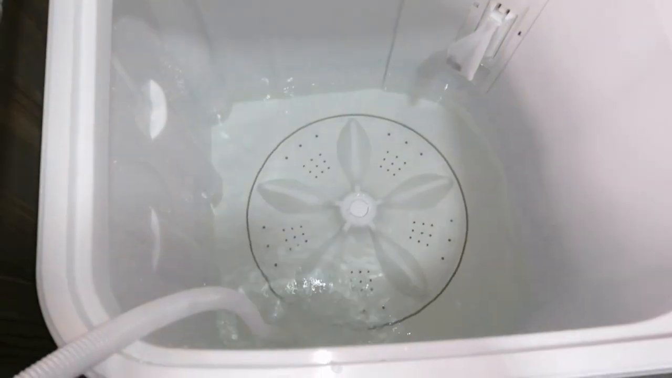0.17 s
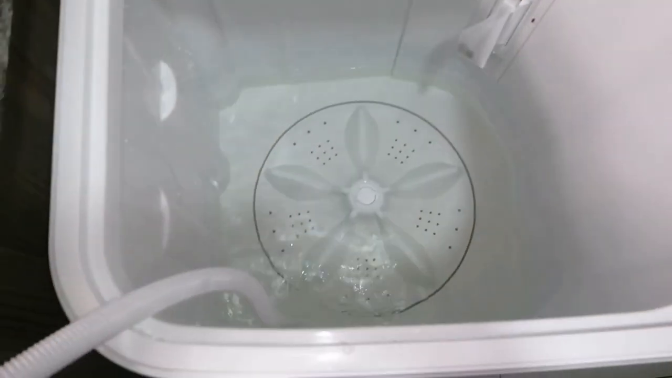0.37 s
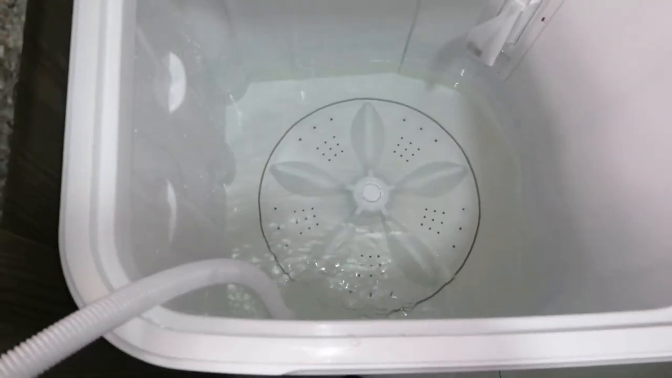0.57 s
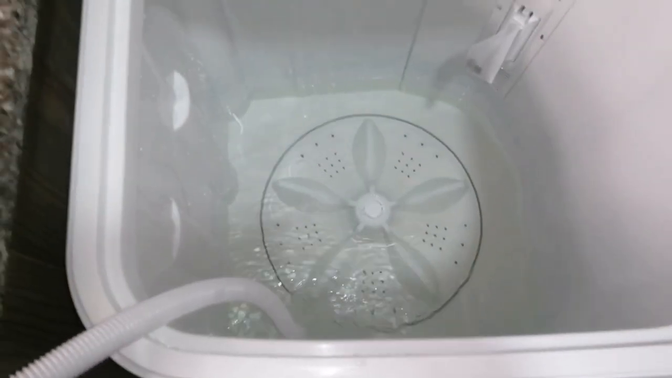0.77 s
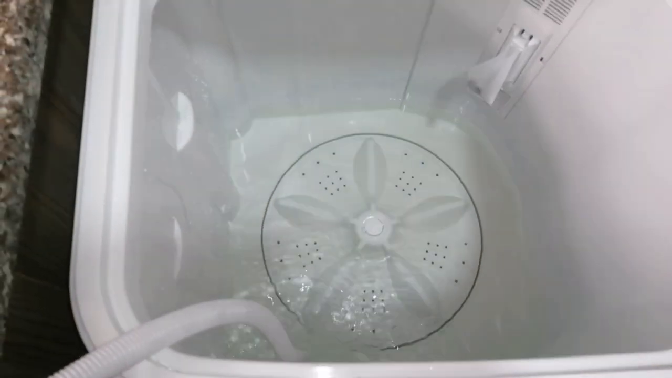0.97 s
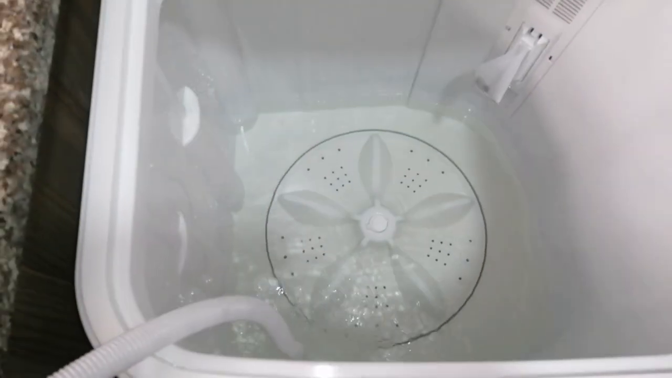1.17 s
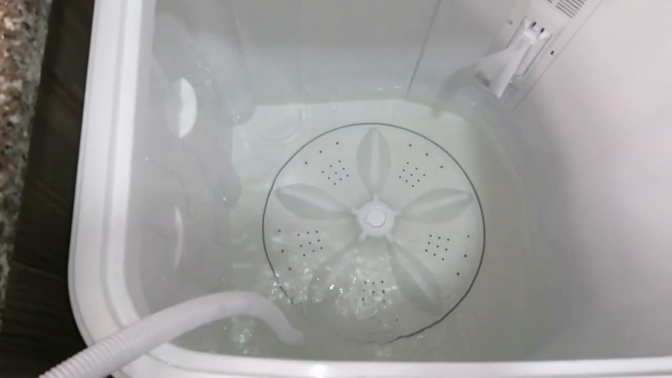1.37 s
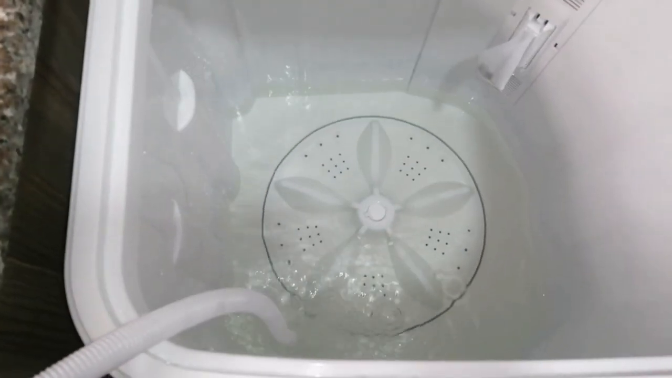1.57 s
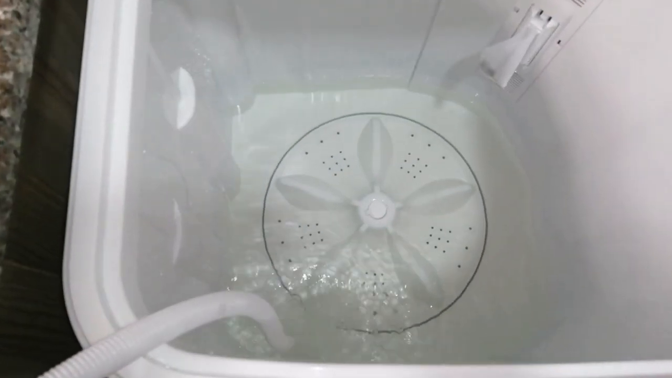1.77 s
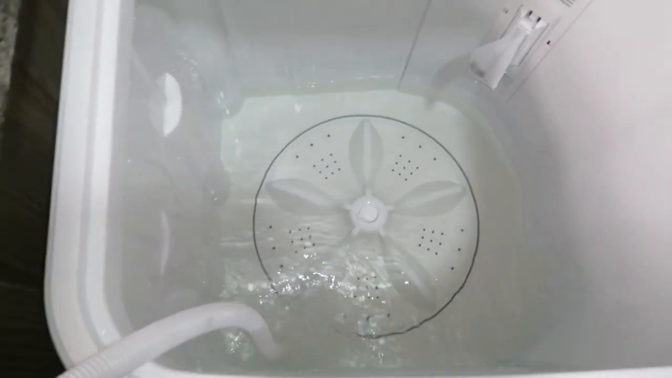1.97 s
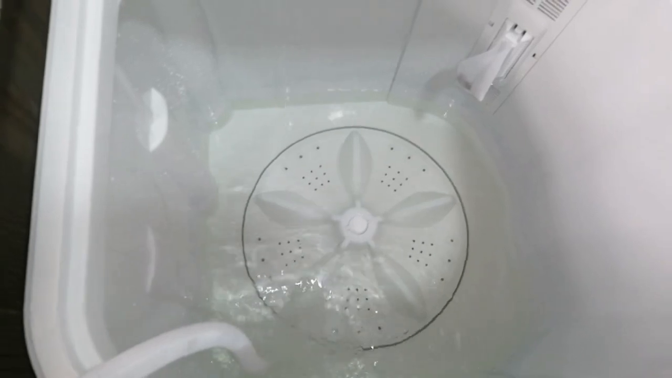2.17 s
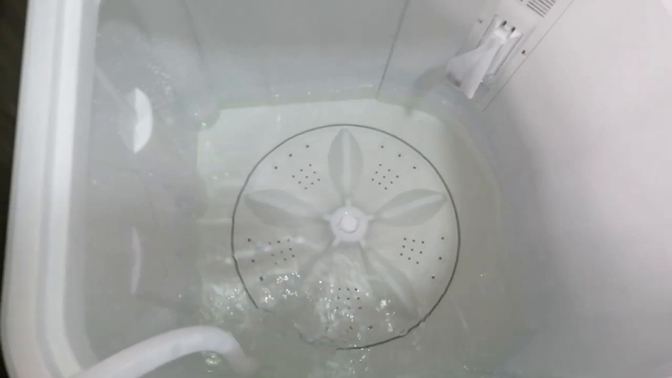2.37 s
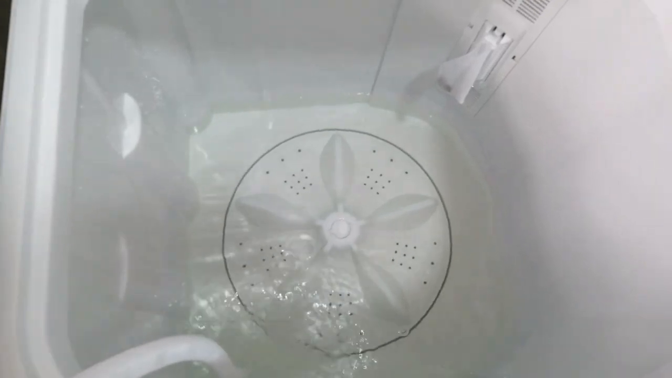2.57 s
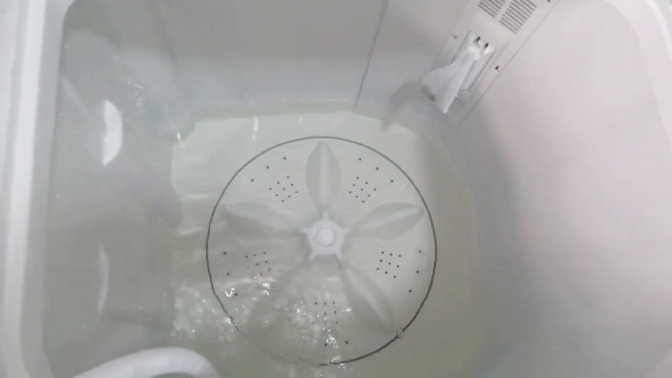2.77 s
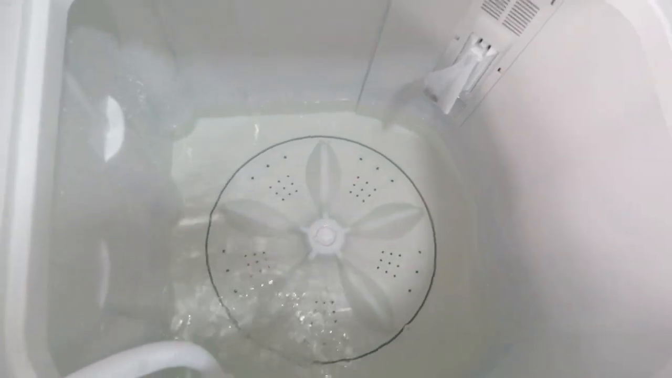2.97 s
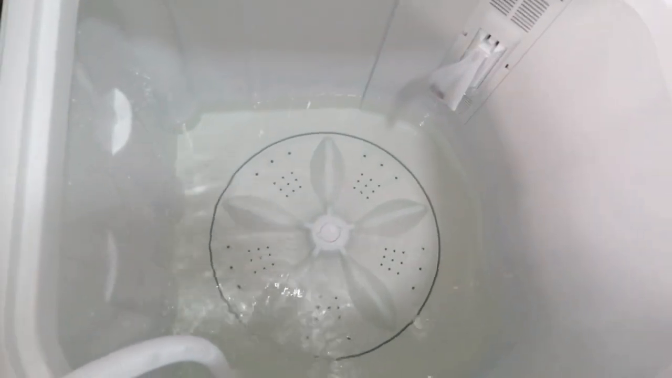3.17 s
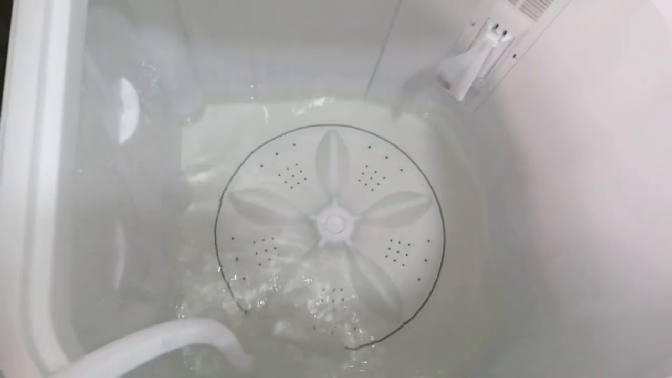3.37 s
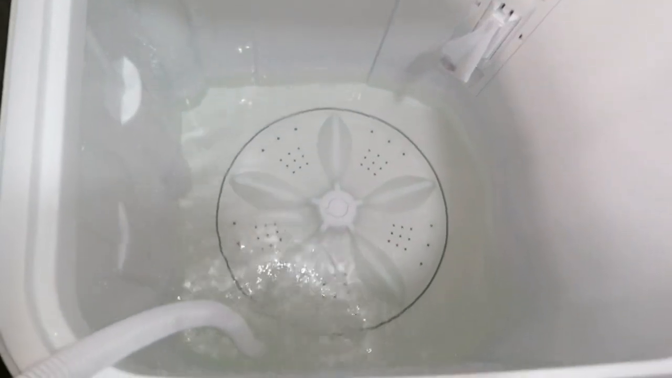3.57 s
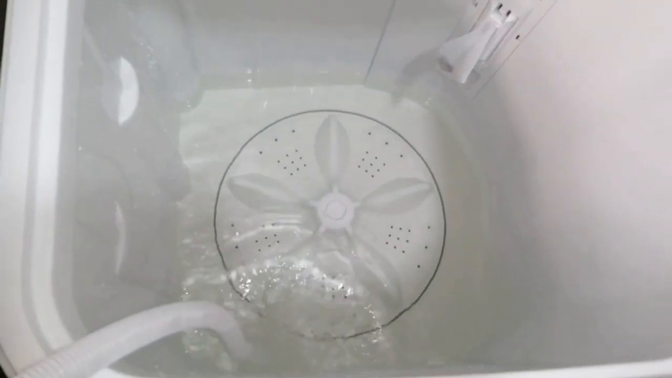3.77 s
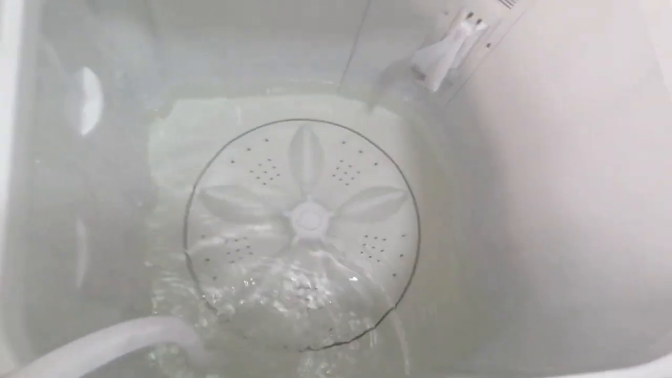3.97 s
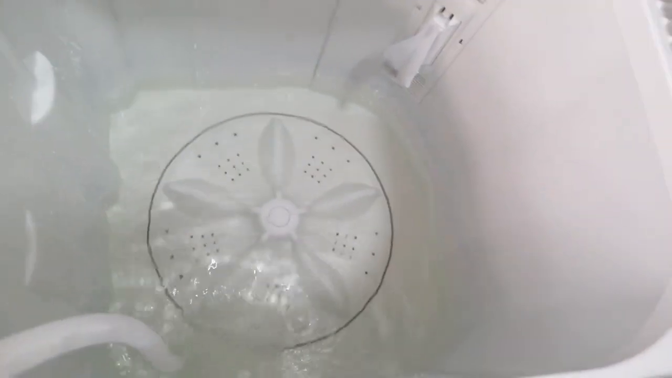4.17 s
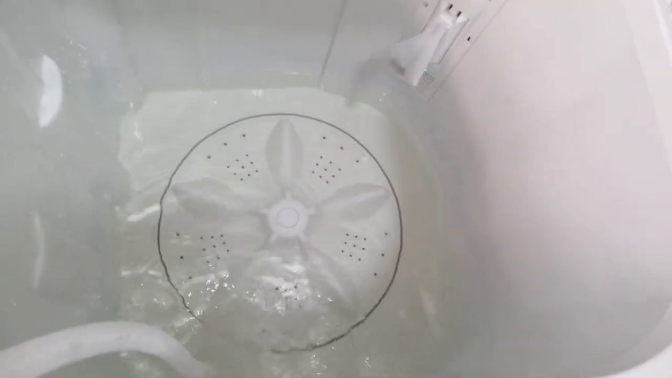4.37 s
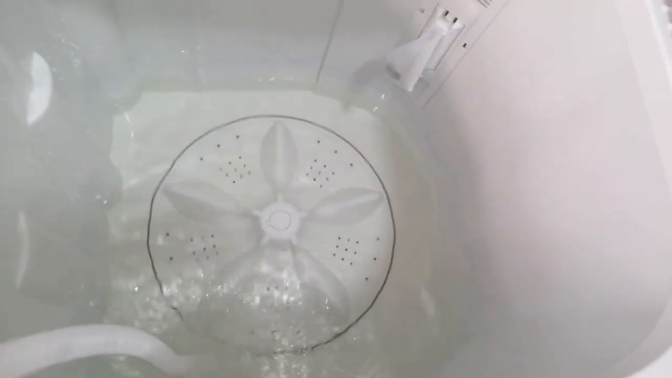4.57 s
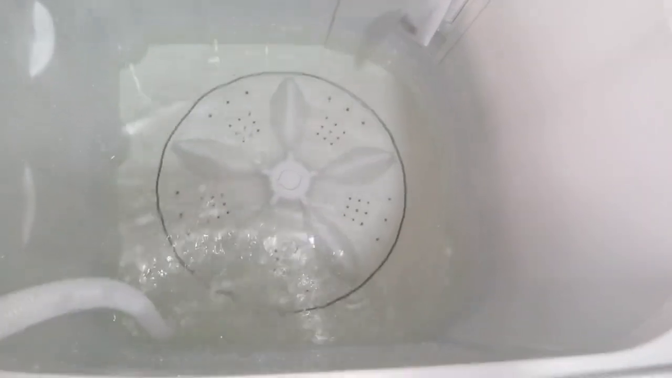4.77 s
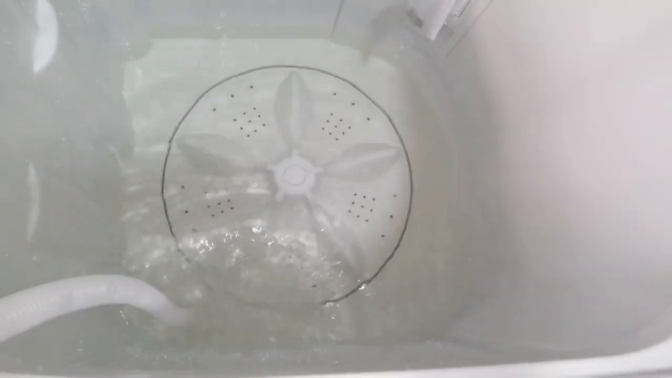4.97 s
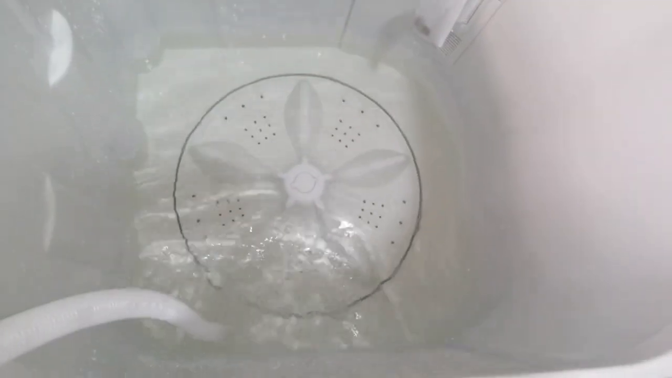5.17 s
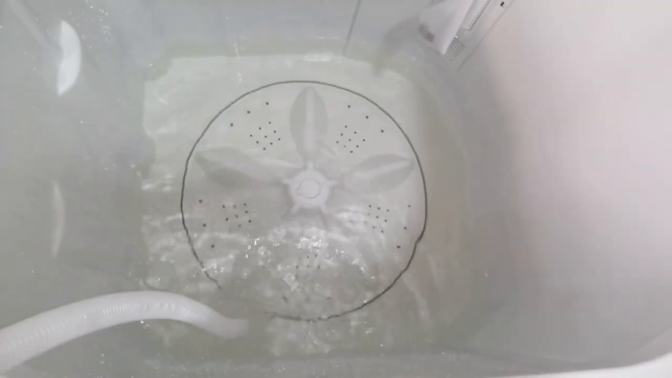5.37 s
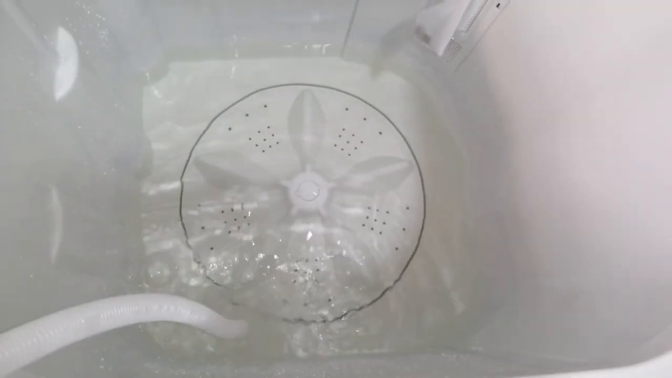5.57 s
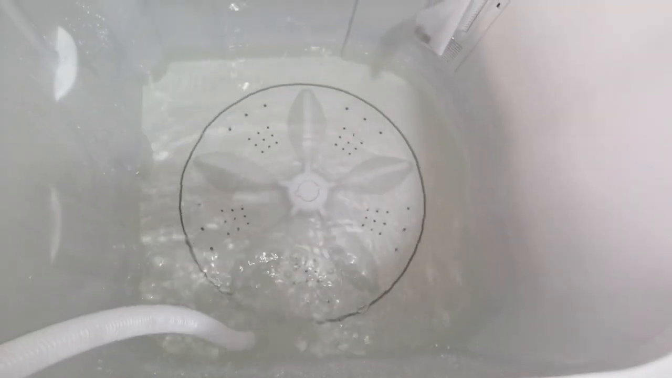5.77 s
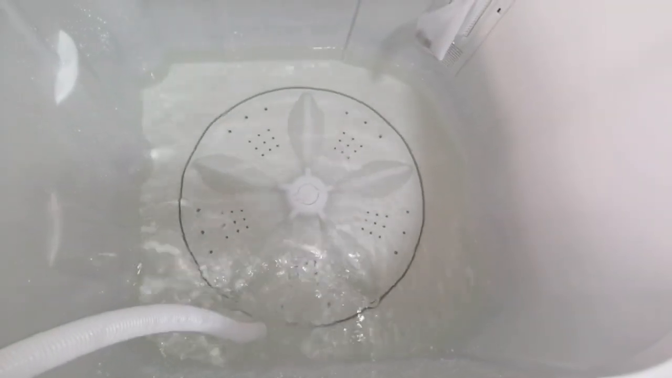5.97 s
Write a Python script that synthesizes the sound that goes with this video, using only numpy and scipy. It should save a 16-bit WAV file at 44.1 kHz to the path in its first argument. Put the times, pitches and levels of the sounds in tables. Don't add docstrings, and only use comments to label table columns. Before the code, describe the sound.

A strong jet of water churns in a hollow plastic basin, fizzing and plopping, easing off, then growing busier with low glugs.

```python
import sys
import numpy as np
from scipy import signal
from scipy.fft import rfft, irfft, next_fast_len
from scipy.io import wavfile
from scipy.ndimage import uniform_filter1d

SR = 44100
rng = np.random.default_rng(int(sys.argv[2]) if len(sys.argv) > 2 else 0)


def boost(x):
    u = np.asarray(x, float) / 20
    return 10 ** u


def digitize_waveform(pressure):
    field = np.atleast_2d(pressure).T
    bounded = np.clip(field, -1, 1)
    quanta = np.round(bounded * 32767).astype(np.int16)
    wavfile.write(sys.argv[1], SR, quanta)


N = 264820
SIZE = next_fast_len(N + SR)


# low_hz, high_hz, cycles_per_grain, grains_per_s, size_spread_db, clumping_db
LAYERS = [
    (72.5, 340, 3.33, 900, 1.5, -5),
    (329.2, 1064, 4.33, 2200, 3, 1),
    (1549, 4430, 6.2, 3200, 4.5, 6),
    (4106, 7530, 9.4, 9000, 4.5, 2),
    (7640, 15040, 6.8, 6300, 16, 8),
    (943, 1667, 3.3, 1400, 6.5, 4),
]


def stream(hz, heard):
    s, levels = layer_levels()
    gurgle_db, slosh_db, bubbles_db, fizz_db = levels
    spray_db = -60.5 + 0.92 * (fizz_db + 48.0) + 0.073 * (bubbles_db + 40.0)
    froth_db = -59.5 + 0.94 * (slosh_db + 55.5) + 0.077 * (bubbles_db + 50.5)
    levels = [gurgle_db, slosh_db, bubbles_db, fizz_db, spray_db, froth_db]
    t = np.arange(N) / SR
    shared = surges(25.)
    out = 0
    for (low, high, cycles, rate, spread_db, clump_db), level_db in zip(LAYERS, levels):
        band = 1 / np.sqrt((1 + (low / (hz + 1)) ** 10) * (1 + (hz / high) ** 10))
        z = band * grains(low, high, cycles, rate, spread_db)
        loudness = np.std(irfft(z * heard, SIZE)[:N])
        surge_db = np.clip(clump_db, 0, 1.2) * (.7 * shared + .6 * surges(35.))
        gain = boost(np.interp(t, s, level_db) + surge_db - 6.0)
        out = out + irfft(z, SIZE)[:N] / loudness * gain
    return boost(-3.5) * favour(t, out)


# time_s, level_db
FLOW = [(.28, 10.5), (.4, 6), (.55, 12), (.9, 10.5), (1.15, 6.5), (1.36, 7), (1.55, 9), (1.75, 0.5),
        (2.1, 5.5), (2.44, 7.5), (2.95, 6), (3.54, 7), (4.1, 5.5), (4.6, 2), (4.82, 4), (5.09, 1.5),
        (5.38, 4.5), (6.0, -1.5)]
CALM_DB = [-57, -58.5, -56.5, -53.5]
FOLLOW = [0.39, 0.46, 0.6, 0.65]
# start_s, level_db, length_s, slosh_share (0 gurgle - 1 slosh)
CHURNS = [(0.344, 0.5, 0.15, 0.93), (0.498, 16.5, 0.069, 0.11), (0.833, 7, 0.037, 0.55),
          (0.975, 15, 0.055, 0.054), (1.051, 13.5, 0.086, 0.024), (1.499, 9, 0.063, 0.55),
          (1.862, 3.5, 0.22, 0.38), (2.005, 6, 0.049, 0.22), (2.152, 7, 0.1, 0.37),
          (2.247, 15, 0.099, 0.13), (2.4, 5.5, 0.19, 0.46), (2.885, 14, 0.033, 0.21),
          (2.994, 10, 0.084, 0.31), (3.114, 5, 0.066, 0.45), (3.265, 6.5, 0.098, 0.18),
          (3.473, 2.5, 0.12, 0.51), (3.62, 13, 0.043, 0.027), (3.767, 4.5, 0.084, 0.26),
          (4.058, 21.5, 0.039, 0.056), (4.105, 4, 0.018, 0.84), (4.197, 11, 0.22, 0.09),
          (4.426, 9.5, 0.2, 0.11), (4.564, 9.5, 0.15, 0.45), (4.65, 12.5, 0.29, 0.4),
          (4.925, 10, 0.15, 0.75), (5.041, 15.5, 0.053, 0.43), (5.115, 12, 0.16, 0.34),
          (5.33, 5, 0.19, 0.47), (5.446, -7.5, 0.11, 0.18), (5.752, 7, 0.068, 0.49),
          (5.82, 5, 0.28, 0.0094)]
# start_s, level_db, length_s, fizz_share (0 bubbles - 1 fizz)
SPLASHES = [(0.284, 7.5, 0.17, 0.17), (0.419, 7.5, 0.12, 0.89), (0.597, 3.5, 0.34, 0.56),
            (0.914, 6, 0.34, 0.53), (1.444, 10, 0.11, 0.12), (1.832, 10, 0.072, 0.4), (2, 3, 0.46, 0.22),
            (2.164, 9.5, 0.036, 0.21), (2.322, 9.5, 0.12, 0.78), (2.53, 6.5, 0.24, 1),
            (2.796, 8.5, 0.16, 0.8), (3.044, 9, 0.08, 0.75), (3.145, 10, 0.1, 0.73),
            (3.271, 16, 0.039, 0.55), (3.42, 5.5, 0.5, 0.16), (3.695, 5.5, 0.25, 0.037),
            (3.953, 10, 0.17, 0.18), (4.1, 8, 0.016, 0.58), (4.177, 15, 0.12, 0.8),
            (4.314, 8.5, 0.32, 0.46), (4.527, 7.5, 0.2, 0.26), (4.622, 10.5, 0.078, 0.55),
            (4.849, 24, 0.068, 0.25), (4.921, 12, 0.22, 0.33), (5.035, 14, 0.018, 0.27),
            (5.105, 17, 0.078, 0.19), (5.183, 8.5, 0.043, 0.44), (5.356, 13, 0.077, 0.69),
            (5.465, 7, 0.25, 0.31), (5.654, 8, 0.74, 0.62)]


def layer_levels():
    t = np.arange(0, N / SR + .01, .002)
    s, db = np.transpose(FLOW)
    flow_db = np.interp(t, s, db)
    bursts_db = bursts(t, CHURNS) + bursts(t, SPLASHES)
    levels = [calm_db + share * flow_db + burst_db
              for calm_db, share, burst_db in zip(CALM_DB, FOLLOW, bursts_db)]
    return t, levels


def bursts(t, rows):
    rise_s, choke_s, choke_share = 0.0091, 0.0035, 0.04
    s, db, length_s, high_share = np.transpose(rows)[:, :, None]
    u = t - s
    rise = (1 + choke_share) * (1 - np.exp(-abs(u) / rise_s)) - choke_share
    shape = np.where(u > 0, rise, -choke_share)
    shape = db * shape * np.exp(-(u / np.where(u > 0, length_s, choke_s)) ** 2)
    return [(shape * np.clip(2 * part, 0, 1)).sum(0) for part in (1 - high_share, high_share)]


def surges(rate_hz):
    kicks = rng.exponential(1, N) * (rng.random(N) < rate_hz / SR)
    r = np.exp(-1.5 * rate_hz / SR)
    x = signal.lfilter([1], [1, -r], kicks)
    return evened(x - x.mean())


def evened(x):
    return x / np.sqrt(np.mean(np.atleast_2d(x).mean(0) ** 2) + 1e-20)


def grains(low_hz, high_hz, cycles, rate, spread_db, count=14):
    size_db = spread_db * np.minimum(rng.exponential(1, N), 3.5)
    size = boost(size_db) * (rng.random(N) < rate / SR)
    kind = rng.integers(0, count, N)
    draws = rng.random((count, 3))
    pitches = low_hz * (high_hz / low_hz) ** ((np.arange(count) + draws[:, 0]) / count)
    out = np.zeros(N)
    for k, (f, (_, rise, phase)) in enumerate(zip(pitches, draws)):
        g = bubble(f, cycles, 0.041 * rise, phase)
        g = g / np.linalg.norm(g) * np.sqrt(f)
        out += signal.oaconvolve(size * (kind == k), g)[:N]
    return rfft(out, SIZE)


def bubble(hz, cycles, rise, phase):
    u = np.arange(int(4 * cycles * SR / hz) + 8) * hz / SR / cycles
    return (1 - np.exp(-5 * u)) * np.exp(-2 * u) * np.sin(2 * np.pi * (cycles * u * (1 + rise * u) + phase))


# time_s, fizz_hz, bubbles_hz
FAVOURED = [(0.3, 5440, 2940), (1.03, 5440, 3500), (1.51, 5400, 2830), (1.63, 5440, 3370),
            (3.09, 5440, 3020), (3.12, 5780, 3280), (3.49, 5230, 2800), (3.59, 5730, 3850),
            (3.67, 5500, 2570), (3.79, 5470, 3130), (4.0, 5440, 2300), (4.08, 5950, 3460),
            (5.11, 5700, 2800), (5.17, 5670, 3400), (5.4, 6240, 2940), (6.0, 5260, 3140)]


def favour(t, x):
    width_hz, share = 645, 0.74
    s, *curves = np.transpose(FAVOURED)
    return x + share * sum(resonate(x, np.interp(t, s, hz), width_hz) for hz in curves)


def resonate(x, hz, width_hz):
    turn = np.exp(2j * np.pi * np.cumsum(hz) / SR)
    r = np.exp(-np.pi * width_hz / SR)
    return 2 * (turn * signal.lfilter([1 - r], [1, -r], x / turn)).real


# start_s, peak_db, pitch_hz, spray_below_peak_db
PLOPS = [(0.429, -29, 3260, -16), (0.614, -22.5, 3260, -43), (.665, -20.5, 3270, -26),
         (.781, -23.5, 3880, -30), (.932, -25, 3620, -37), (.985, -23, 3820, -27), (1.389, -40, 3000, -11),
         (1.523, -34.5, 2300, -6), (1.86, -39, 2020, -30), (2.1347, -25.5, 3300, -42),
         (2.503, -32, 3170, -39), (3.142, -23.5, 3630, -28), (3.553, -24, 3820, -23),
         (3.7254, -27, 3650, -15), (3.965, -25, 3720, -41), (3.9845, -28.5, 1990, -35),
         (4.535, -15, 2900, -27.5), (4.858, -27.5, 2685, -21), (5.058, -16.5, 2080, -28),
         (5.126, -19, 3310, -23), (5.1693, -18.5, 3530, -29), (5.237, -15.5, 3370, -39),
         (5.7592, -19.5, 3540, -24), (5.827, -17.5, 3460, -29)]
# start_s, peak_db, pitch_hz
DROPS = [(0.357, -32, 5430), (0.4277, -36, 5900), (0.512, -29, 5120), (0.558, -27.5, 5420),
         (0.6647, -29, 5180), (0.782, -31.5, 5080), (1.0626, -32, 4980), (1.1884, -31, 5300),
         (1.227, -35.5, 6100), (1.3067, -32.5, 5040), (1.518, -37, 5740), (1.6258, -37.5, 5800),
         (1.6656, -39, 6100), (1.7267, -28.5, 5070), (1.8453, -38, 5400), (1.956, -38.5, 5560),
         (1.988, -39, 5550), (2.2487, -32.5, 5260), (2.297, -37, 5370), (2.3437, -30, 5570),
         (2.4934, -29.5, 5500), (2.533, -19.5, 5400), (2.5898, -31, 5340), (2.642, -37, 5400),
         (2.769, -32, 5460), (2.8956, -31.5, 5360), (2.9173, -31, 5380), (3.0077, -35.5, 5650),
         (3.141, -28.5, 5870), (3.2047, -28.5, 5870), (3.283, -37, 5700), (3.408, -33.5, 5000),
         (3.464, -33.5, 5400), (3.6325, -37, 5500), (3.896, -34.5, 5960), (3.96, -34, 5460),
         (4.0622, -31.5, 6050), (4.1187, -23.5, 5740), (4.194, -24, 6040), (4.302, -30, 5640),
         (4.332, -28.5, 5800), (4.4255, -33.5, 5400), (4.473, -22.5, 5990), (4.5379, -28, 5830),
         (4.606, -29, 5920), (4.669, -28, 5600), (4.859, -39, 5870), (4.9433, -33, 5370),
         (5.001, -36, 5980), (5.057, -30, 5640), (5.0856, -26.5, 5600), (5.1358, -30, 5100),
         (5.172, -33.5, 4400), (5.218, -46, 5700), (5.3308, -29.5, 5980), (5.3853, -33, 6040),
         (5.4516, -24, 6030), (5.61, -33, 6080), (5.679, -29, 6200), (5.8292, -36, 6240),
         (0.33, -55, 5500), (0.461, -42, 3160), (.461, -51, 4830), (.478, -56, 6403), (.512, -39, 6650),
         (0.779, -33.5, 6460), (0.863, -42, 3100), (1.409, -53, 2940), (1.465, -54, 3270),
         (1.524, -40.5, 3160), (1.934, -44.5, 3730), (2.07, -37, 4470), (2.342, -50, 3360),
         (2.428, -30.5, 5560), (2.904, -40.5, 3970), (3.143, -35, 6850), (3.278, -31.5, 3350),
         (3.286, -42, 2600), (3.307, -37, 2740), (3.463, -37.5, 2800), (3.636, -45.5, 2280),
         (3.764, -46, 1950), (3.801, -40, 6960), (3.852, -45, 2490), (3.892, -40, 4630), (4.005, -41, 2370),
         (4.189, -43, 3290), (4.251, -30.5, 5900), (4.345, -40, 3800), (4.415, -38, 2770),
         (4.48, -37, 3230), (4.561, -45, 3030), (4.594, -38.5, 2700), (4.629, -41, 3340),
         (4.667, -30, 3430), (4.668, -35, 4700), (4.707, -35.5, 4020), (4.736, -36, 3560),
         (4.864, -41, 3440), (4.942, -37, 2930), (4.977, -32, 2870), (5.006, -37, 4630), (5.015, -34, 3020),
         (5.061, -28, 2880), (5.087, -35, 4820), (5.268, -35.5, 3220), (5.378, -45, 3540),
         (5.627, -31, 5960), (5.687, -26.5, 5800), (5.693, -29.5, 5370), (5.746, -34, 2930),
         (5.825, -42, 4762), (5.851, -43, 4340), (5.883, -37.5, 6430)]


def plops(hz, heard):
    lift_db, spray_db = 11, -41
    rows = PLOPS + [(s, db + lift_db, f, spray_db) for s, db, f in DROPS]
    bell, spray, splash, spit = np.zeros((4, N))
    u = np.arange(2000) / SR
    puffs = rng.standard_normal((len(rows), 2000))
    for (s, db, f, mist_db), draws, puff in zip(rows, rng.random((len(rows), 4, 3)), puffs):
        large = f < 4500
        gap_s = 0.014 * (1.5 if large else 1)
        for k, (late, detune, phase) in enumerate(draws):
            pitch = f * (1 + (k > 0) * (.2 if large else .1) * (detune - .5))
            g = bubble(pitch, 6.5 + 0.0011 * f, 0.002, phase)
            gain = boost(db - 4.0 - 2.6 * k) / np.interp(f, hz, heard)
            add(bell, s + gap_s * (k > 0) * (k - late) / 2, g * gain)
        add(spray, s, boost(db + mist_db - 10.0) * puff * np.exp(-u / 0.025))
        hit = puff[::-1] * (1 - np.exp(-u / 0.00078)) * np.exp(-u / 0.0045)
        add(splash if large else spit, s, boost(db - 7.5) * hit)
    wide = rfft(splash, SIZE) / np.sqrt((1 + (1800 / (hz + 1)) ** 4) * (1 + (hz / 8000) ** 4))
    wide += rfft(spit, SIZE) / np.sqrt((1 + (3900 / (hz + 1)) ** 8) * (1 + (hz / 8000) ** 4))
    return bell + irfft(wide, SIZE)[:N] + mist(hz, heard, spray)


def add(mix, s, sound):
    part = mix[round(s * SR):][:len(sound)]
    part += sound[:len(part)]


def mist(hz, heard, noise):
    high = rfft(noise, SIZE) / np.sqrt(1 + (8500 / (hz + 1)) ** 6)
    return irfft(high / heard, SIZE)[:N]


# start_s, peak_db, pitch_hz, slap_relative_to_peak_db
GLUGS = [(.337, -39, 600, 7), (0.505, -33, 124, -2.5), (.655, -35.5, 111, -1.5), (0.775, -36, 145, -3),
         (0.859, -35, 145, -9), (0.975, -37, 143, 5), (1.058, -34.5, 134, -4.5), (1.512, -25, 589, -25),
         (1.86, -25.5, 970, -16), (1.919, -33, 87.6, -9), (2.173, -26.5, 155, -7.5), (2.246, -36, 125, -5),
         (2.443, -30, 113, -31), (2.836, -32, 91, -8.5), (2.992, -43, 94, 11.5), (3.133, -38, 138, -2),
         (3.276, -38, 91, 2), (3.452, -36.5, 258, -1.5), (3.738, -27.5, 255, -12), (3.911, -32, 108, -32),
         (4.066, -27.5, 95, -19), (4.184, -25, 139, -7), (4.533, -26, 234, -7), (4.641, -21, 417, -16),
         (4.946, -43, 417, -21), (5.05, -25, 310, -22), (5.121, -34, 179, 1), (5.311, -30, 780, -19),
         (5.74, -29.5, 585, -19), (5.826, -31.5, 156.6, -9), (5.855, -31, 136, -30), (5.92, -30, 110, -27),
         (5.955, -33.5, 101, -24)]


def glugs(hz, heard):
    bell, slap = np.zeros((2, N))
    u = np.arange(2000) / SR
    puffs = rng.standard_normal((len(GLUGS), 2000))
    for (s, db, f, slap_db), phase, puff in zip(GLUGS, rng.random(len(GLUGS)), puffs):
        add(bell, s, bubble(f, 4.25, .012, phase) * boost(db - 8.5) / np.interp(f, hz, heard))
        hit = puff * (1 - np.exp(-u / 0.0087)) * np.exp(-u / 0.012)
        add(slap, s, boost(db + slap_db + 6.0) * hit)
    low = rfft(slap, SIZE) / np.sqrt((1 + (200 / (hz + 1)) ** 4) * (1 + (hz / 950) ** 8))
    return bell + irfft(low / heard, SIZE)[:N]


# start_s, level_db, pitch_hz
GULPS = [(0.311, -60, 89), (0.328, -65, 160), (0.416, -47, 312), (0.425, -39.5, 600), (0.507, -45.5, 570),
         (0.513, -39, 270), (0.525, -39, 168), (0.873, -40, 600), (0.969, -51, 720), (0.972, -63, 409),
         (0.982, -36.5, 270), (1.065, -44, 260), (1.072, -42, 170), (1.504, -49, 910), (1.596, -42.5, 215),
         (1.605, -43.5, 593), (2.172, -51, 524), (2.188, -47, 734), (2.205, -43, 530), (2.249, -37.5, 330),
         (2.276, -40, 173), (2.457, -44, 360), (2.596, -39, 352), (2.893, -39.5, 726), (2.902, -40, 1010),
         (2.992, -37, 350), (2.993, -43.5, 604), (3.128, -45, 715), (3.305, -38.5, 103), (3.338, -41, 520),
         (3.35, -41, 900), (3.752, -42, 452), (4.069, -42, 828), (4.099, -43.5, 856), (4.178, -44, 924),
         (4.195, -45, 377), (4.217, -31.5, 140), (4.443, -41.5, 344), (4.542, -38.5, 467),
         (4.548, -40, 597), (4.58, -34.5, 409), (4.6, -31.5, 600), (4.648, -30.5, 627), (4.69, -44, 810),
         (4.717, -35, 246), (4.721, -30, 362), (4.746, -31, 228), (4.782, -32.5, 235), (4.805, -37.5, 809),
         (4.805, -40, 530), (4.824, -40, 222), (4.839, -39, 636), (4.935, -56, 418), (4.984, -36.5, 960),
         (5.027, -39.5, 735), (5.114, -49, 930), (5.122, -55, 330), (5.131, -38, 498), (5.15, -37, 277),
         (5.828, -37.5, 363)]


def gulps(hz, heard):
    out = np.zeros(N)
    for (s, db, f), phase in zip(GULPS, rng.random(len(GULPS))):
        g = bubble(f, 0.97 + .007 * f, .012, phase)
        add(out, s, g * boost(db + 1.) / np.interp(f, hz, heard))
    return out


# start_s, peak_db
SPRAYS = [(0.3456, -44), (0.5127, -39.5), (0.6624, -45), (0.7801, -46), (1.061, -46), (1.1214, -40.5),
          (1.571, -39), (1.6267, -41), (1.726, -43), (1.956, -50), (2.2049, -44.5), (2.339, -44),
          (2.4633, -42), (2.641, -40), (2.85, -37), (3.0076, -45), (3.1385, -43), (3.282, -36),
          (3.463, -43), (3.8945, -36.5), (4.07, -35.5), (4.1914, -37), (4.346, -49), (5.062, -35),
          (5.3304, -44), (5.3767, -47), (5.456, -47), (5.615, -36), (5.6885, -44)]


def sprays(hz, heard):
    hiss_db = -70.5
    out = boost(hiss_db) * rng.standard_normal(N)
    u = np.arange(2000) / SR
    fall = np.exp(-u / 0.019) + 0.86 * np.exp(-u / 0.0019)
    for (s, db), puff in zip(SPRAYS, rng.standard_normal((len(SPRAYS), 2000))):
        add(out, s, boost(db - 11.5) * puff * fall)
    return mist(hz, heard, out)


# start_s, peak_db
THUMPS = [
    (.51, -66),
    (1.928, -47),
    (2.845, -50),
    (2.995, -29),
    (4.078, -27.5),
    (4.71, -45),
    (5.196, -36),
    (5.932, -42),
]


def thumps(hz, heard):
    pitch_hz = 53
    out = np.zeros(N)
    for s, db in THUMPS:
        add(out, s, bubble(pitch_hz, 0.34, 0, 0) * boost(db) / np.interp(pitch_hz, hz, heard))
    return out


# start_s, peak_db, pitch_hz
SNAP = (2.53257, -10, 9800)


def snap():
    s, db, f = SNAP
    u = np.arange(N) / SR - s - .00007
    click = boost(db + 1.5) * np.sin(-2 * np.pi * f * u) * np.exp(-(u * f * 1.7) ** 2)
    return click * np.array([[.02], [1]])


def tub(hz, dry, count=8):
    hold = 1500
    wander = np.cumsum(rng.integers(1, count, N // hold + 2)) % count
    spots = np.repeat(wander, hold)[:N] == np.arange(count)[:, None]
    shares = np.sqrt(abs(uniform_filter1d(spots.astype(float), 1200)))
    lags = rng.integers(-14, 5, count)
    return sum(echoes(hz, lag) * rfft(share * dry, SIZE) for lag, share in zip(lags, shares))


# pitch_hz, t60_s
ECHO = [(100, 0.21), (1000, 0.17), (3000, 0.12), (6000, 0.086), (12000, 0.062)]
# pitch_hz, likeness (0-1)
SAME = [(30, 0.29), (80, 0.91), (150, 0.91), (400, 0.88), (800, 0.24), (1200, 0.014), (15000, 0.026)]


def echoes(hz, lag):
    lead_s, wet = .0001, .55
    taps = np.zeros((2, SR // 2))
    at = np.arange(60, SR // 2 - 20, 20) + rng.integers(0, 20, (2, (SR // 2 - 61) // 20))
    np.put_along_axis(taps, at, rng.choice([-1., 1.], at.shape), 1)
    f, t, z = signal.stft(taps, SR, nperseg=128)
    decay = boost(-60 * t / np.maximum(read(ECHO, f), .02)[:, None])
    tails = signal.istft(z * decay, SR, nperseg=128)[1]
    tails = np.sqrt(wet) * tails / np.linalg.norm(tails, axis=1, keepdims=True)
    direct = np.sqrt(1 - wet) * np.exp(-2j * np.pi * hz * np.array([[0], [lag]]) / SR)
    a, b = rfft(tails, SIZE) + direct
    same = np.clip(read(SAME, hz), 0, 1)
    left = (same * a + np.sqrt(1 - same ** 2) * b) * np.exp(2j * np.pi * hz * lead_s)
    return np.array([left, a])


def read(points, hz):
    f, value = np.transpose(points)
    return np.interp(np.log(hz + 1), np.log(f + 1), value)


# pitch_hz, width_hz, gain_db
RING = [(95, 29, 1), (145, 27, 2.5), (255, 14, 3), (384, 145, 5.5), (600, 30, 7), (726, 24.6, 10),
        (816, 20, 5), (910, 127, 7.5), (1224, 98, 6.5), (1555, 54, 5), (2514, 73, 5.5), (3270, 25, -2.5),
        (3550, 50, -2), (6140, 750, -2.5)]
# pitch_hz, gain_db
LEFT = [(30, 6), (140, -1), (400, -10.5), (900, -14.5), (1250, -17.5), (2800, -10), (3600, -14.5),
        (5400, -52), (6500, -111), (8000, -54), (11000, -34.5), (14800, -22.5), (15600, -36)]
# pitch_hz, gain_db
RIGHT = [(30, 6.5), (140, 4.5), (400, -7), (1200, -11), (2300, 1), (3300, 4), (4100, -1.5), (5000, 4.5),
         (5800, 8), (6600, 1), (8000, -10), (11000, -26), (14800, -18.5), (15600, -8)]


def port_colour(hz):
    ring_db = sum(db / (1 + (2 * (hz - f) / width) ** 2) for f, width, db in RING)
    log_gain = np.log(boost(np.array([read(LEFT, hz), read(RIGHT, hz)]) + ring_db))
    cepstrum = irfft(log_gain, SIZE)
    cepstrum[:, 1:SIZE // 2] *= 2
    cepstrum[:, SIZE // 2 + 1:] = 0
    return np.exp(rfft(cepstrum))


def rumble(hz):
    band = 1 / np.sqrt((1 + (hz / 110) ** 4) * (1 + (40 / (hz + 1)) ** 4))
    noise = irfft(rfft(rng.standard_normal((2, N)), SIZE) * band, SIZE)[:, :N]
    s, levels = layer_levels()
    rumble_db = 0.63 * (np.interp(np.arange(N) / SR, s, levels[0]) + 45.5)
    return evened(noise) * boost(np.array([[-59.], [-64.5]]) + rumble_db)


def scene():
    hz = np.fft.rfftfreq(SIZE, 1 / SR)
    colour = port_colour(hz)
    heard = np.sqrt((abs(colour) ** 2).sum(0)) / 2
    water = sum(source(hz, heard) for source in (stream, plops, glugs, gulps, sprays, thumps))
    return irfft(colour * tub(hz, water), SIZE)[:, :N] + rumble(hz)


def top_cut(x):
    return signal.sosfilt(signal.butter(12, 16640, fs=SR, output="sos"), x)


def record(dry):
    start_s, edge_hz = .2802, 15680
    t = np.arange(N) / SR - start_s
    offset = np.array([[-.007], [0]]) * np.exp(-abs(t) / .11)
    edge = signal.firwin(511, edge_hz, window=("kaiser", 8), fs=SR)[None]
    mix = (signal.oaconvolve(dry + snap(), edge, "same") + offset) * (t > 0)
    return top_cut(mix)


dry = scene()
out = record(dry)
digitize_waveform(out)
```